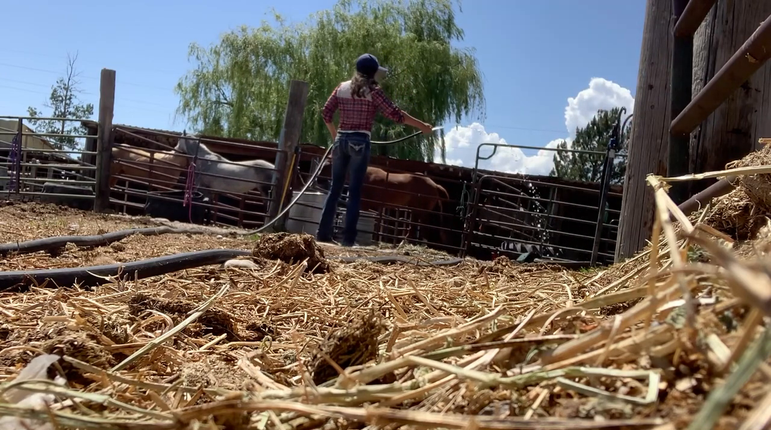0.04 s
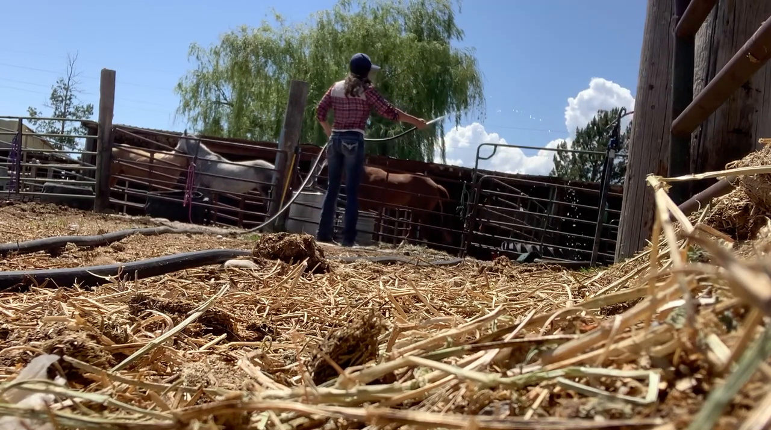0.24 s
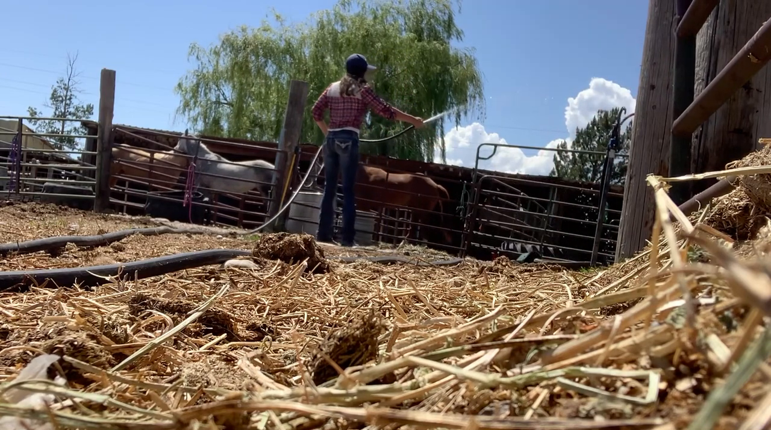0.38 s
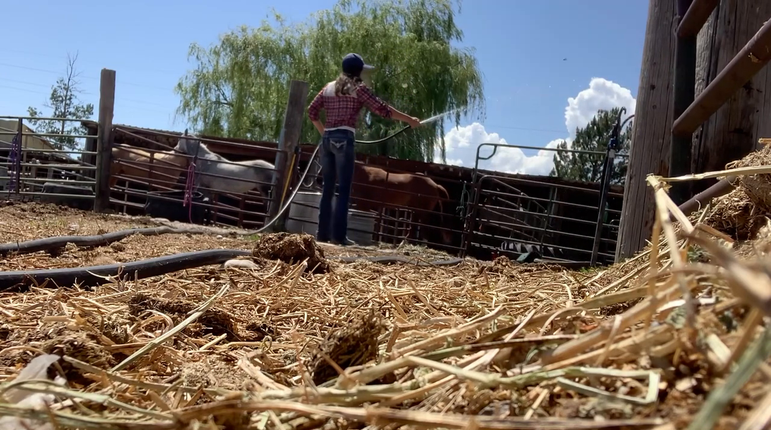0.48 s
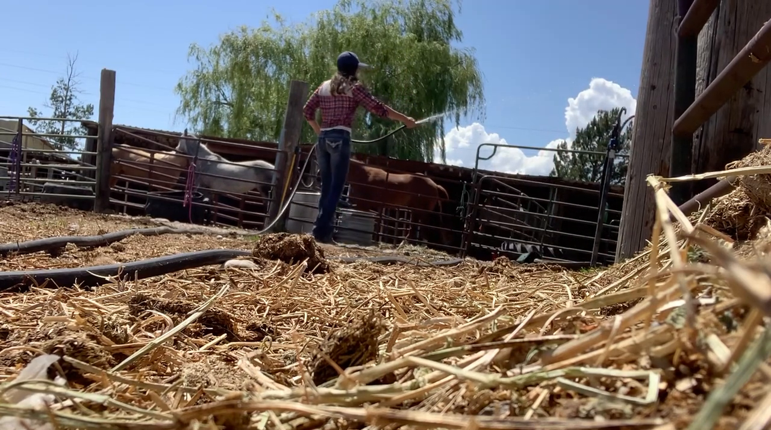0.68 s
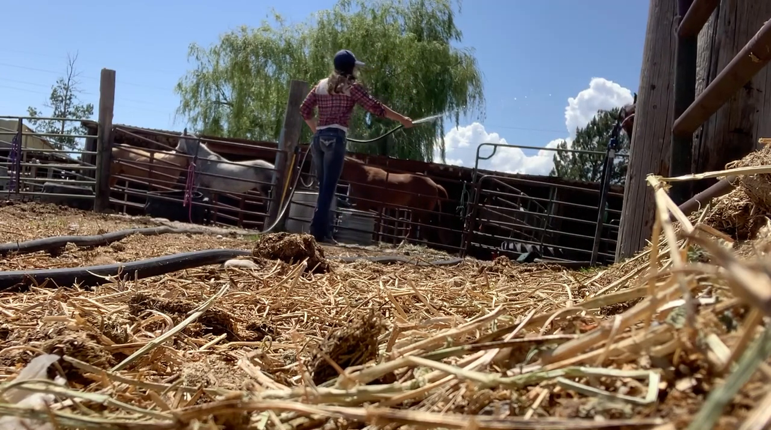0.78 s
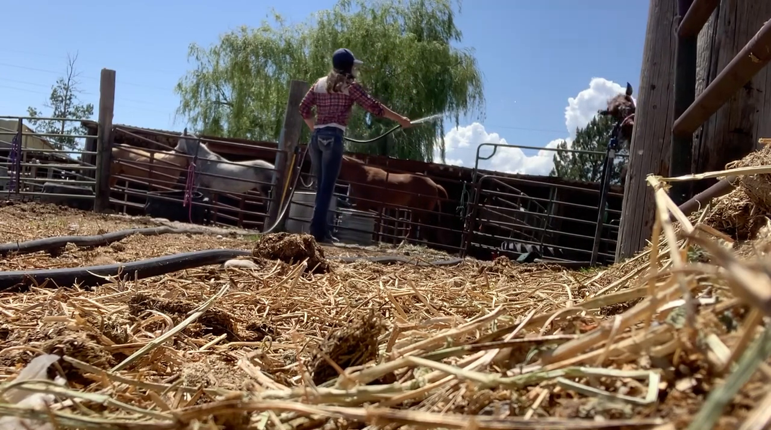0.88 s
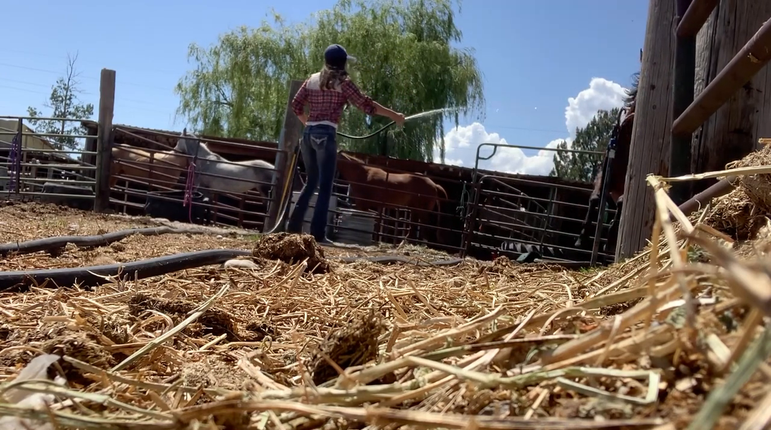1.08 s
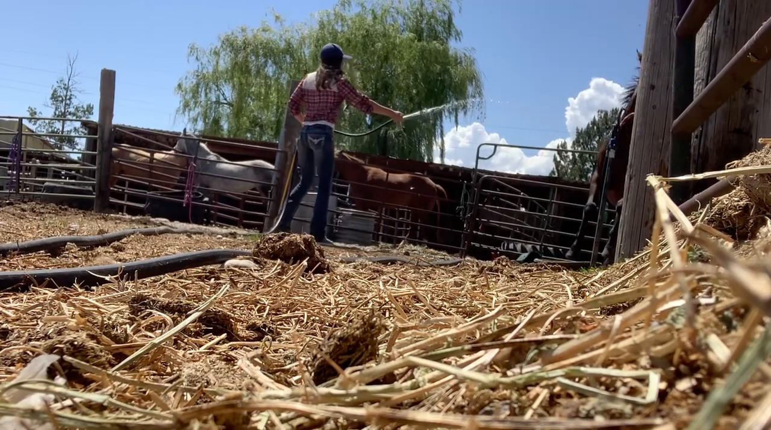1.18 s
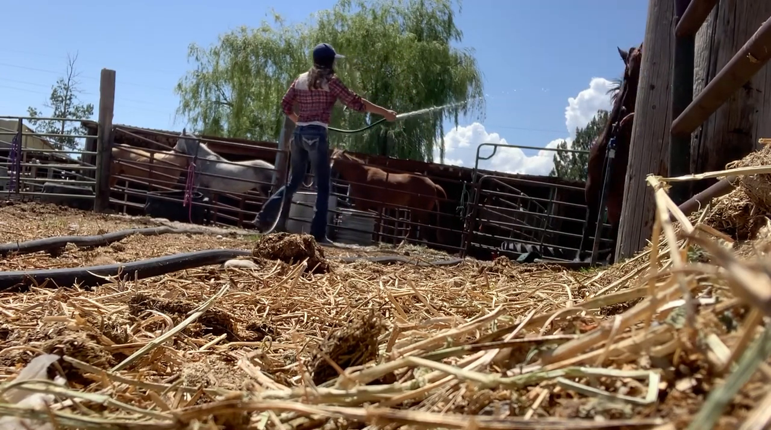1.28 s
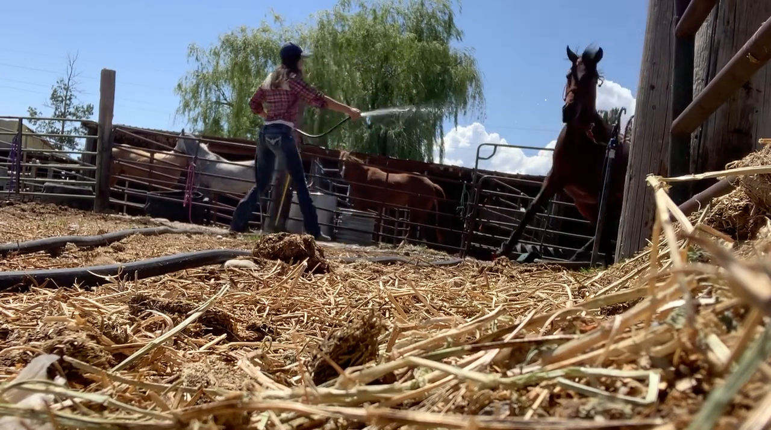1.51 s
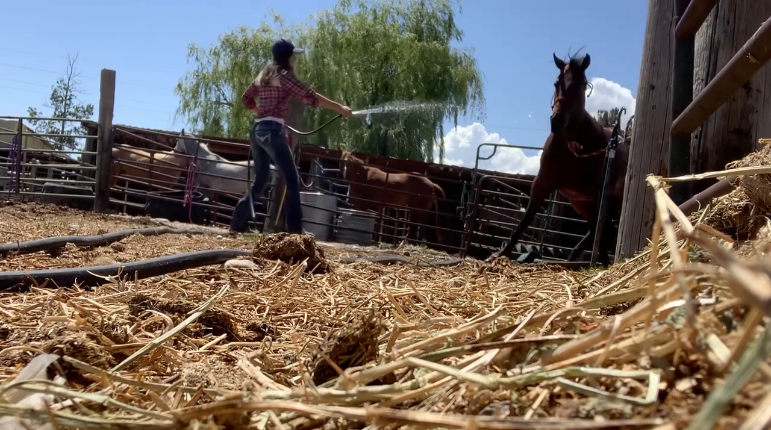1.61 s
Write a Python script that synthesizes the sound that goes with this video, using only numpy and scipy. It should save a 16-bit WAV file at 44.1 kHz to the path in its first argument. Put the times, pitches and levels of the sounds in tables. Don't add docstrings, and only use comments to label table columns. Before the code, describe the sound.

A horse's hooves stamp and thud irregularly on straw-covered dirt, with crunching clods and snapping straw.

```python
import sys
import numpy as np
from scipy import signal
from scipy.fft import rfft, irfft
from scipy.io import wavfile
from scipy.ndimage import uniform_filter1d

SR = 44100
rng = np.random.default_rng(int(sys.argv[2]) if len(sys.argv) > 2 else 0)


def waveform_to_disk(signal):
    frames = np.transpose(np.atleast_2d(signal))
    scaled = np.clip(frames, -1, 1) * 32767
    samples = np.round(scaled).astype(np.int16)
    wavfile.write(sys.argv[1], SR, samples)


def attenuation_scalar(level_db):
    decades = np.asarray(level_db, float) / 20
    return 10 ** decades


N = 72765
T = np.arange(N) / SR

# (time [s], trampling level [dB], straw stirring level [dB], drag level [dB])
ACTIVITY_LEVELS = [(0, -66, -81.5, -55.5), (0.061, -51, -75.5, -49.5), (0.148, -62.5, -79.5, -51.5),
                   (0.268, -51.5, -82, -58.5), (0.356, -59, -72, -49), (0.478, -57.5, -81.5, -51.5),
                   (.58, -44.5, -70.5, -44.5), (0.694, -52, -75.5, -49.5), (0.734, -53.5, -75.5, -39),
                   (0.831, -46, -79.5, -46.5), (0.908, -59.5, -78.5, -55.5), (1.01, -52, -82, -53),
                   (1.134, -54.5, -78, -47.5), (1.27, -60, -70, -55.5), (1.38, -50, -72.5, -41),
                   (1.48, -53, -77, -51.5), (1.571, -66.5, -74.5, -57.5), (1.65, -44, -75, -66)]


def activity_db(column):
    table = np.array(ACTIVITY_LEVELS)
    return np.interp(T, table[:, 0], table[:, column])


def colour(x, points):
    hz, db = np.array(points).T
    bins_hz = np.arange(N // 2 + 1) * SR / N + 1
    gain = attenuation_scalar(np.interp(np.log(bins_hz), np.log(hz), db))
    y = irfft(rfft(x) * gain, N)
    return y / np.sqrt(np.mean(y ** 2))


def band(x, lo_hz, hi_hz):
    return signal.sosfilt(signal.butter(2, [lo_hz, hi_hz], "band", fs=SR, output="sos"), x)


def fade(t, t60):
    return (t > 0) * np.exp(-np.log(1000) * np.maximum(t, 0) / t60)


def grains(rate, spread_db):
    hits = rng.random(N) < rate / SR
    return hits * rng.standard_normal(N) * attenuation_scalar(spread_db * rng.exponential(size=N))


def patchy(x, lo_hz, rate, patchy_db, count):
    edge = lo_hz * 2 ** (np.arange(count + 1) / 3)
    k = int(SR / rate)
    held = np.repeat(rng.standard_normal((count, N // 200)), k, axis=1)[:, :N]
    smooth = uniform_filter1d(uniform_filter1d(held, k), k)
    gain = attenuation_scalar(patchy_db * smooth)
    return sum((-1) ** i * band(x, edge[i], edge[i + 1]) * g for i, g in enumerate(gain))


def soil(tail):
    # (frequency [Hz], level [dB per Hz])
    soil_spectrum = [(18, -53.5), (30, -7.5), (81, -4.5), (291, -6), (428, -13), (564, -18.5),
                     (1150, -31.5), (1730, -41), (2400, -45), (3120, -65), (5280, -120)]
    loosened = attenuation_scalar(-11.5) * tail
    rumble_env = attenuation_scalar(activity_db(1) + 3.0) + loosened
    drag_env = attenuation_scalar(activity_db(3) - 2.5) + loosened
    out = []
    for _ in range(2):
        noise = colour(grains(12000, 0.65), soil_spectrum)
        rumble = rumble_env * patchy(noise, 31.58, 25.4, 3.2, count=8)
        drag = drag_env * patchy(noise, 194.2, 54.25, 3.0, count=11)
        out.append(rumble + drag)
    return out


def straw(tail):
    # (frequency [Hz], level [dB per Hz])
    straw_spectrum = [(1500, -38.5), (2400, -3), (5000, -4.5), (8000, -3.5), (11000, -3), (14500, -3.5),
                      (15700, -0.5), (16100, -54)]
    # (time [s], level [dB], low crackle [dB], low crackle pitch [Hz], high crackle [dB])
    snaps = [(0.032, -61, -13, 2260, 8), (0.0568, -27, -28, 5400, -25), (0.0689, -41.5, -20, 5550, -9),
             (0.1992, -58, 3, 5700, -18), (0.237, -57, -39, 2440, -16), (0.2808, -36, -52, 5110, -5),
             (0.308, -39.5, -14.5, 3670, -34), (0.5208, -30, -7.5, 2090, -32),
             (0.5455, -46.5, 1, 3270, -18), (0.6107, -36, -37, 5960, -15), (0.634, -30, -27.5, 3650, -9),
             (0.649, -28, -25, 2340, -14.5), (0.700, -34.5, -32, 5050, -12),
             (0.7346, -35, -27.5, 2700, -16), (0.7856, -40.5, -11.5, 2380, -5.5),
             (0.8924, -54.5, -7, 4570, 4.5), (1.0304, -50.5, -8, 5050, -27),
             (1.051, -47.5, -5.5, 3880, -10), (1.1983, -37, -13.5, 4560, -3.5),
             (1.3062, -31.5, -14.5, 6350, -31), (1.3304, -57, -21, 3640, 9),
             (1.5194, -34.5, -14, 4560, -6.5), (1.5286, -32, -21, 4770, -14),
             (1.6173, -27.5, -28, 3540, -8)]
    # (time [s], level [dB])
    ticks = [(0.018, -64), (0.06, -32), (0.074, -38), (0.083, -38), (0.1216, -57), (0.1496, -58),
             (0.21, -44), (0.396, -48), (0.415, -49), (0.6274, -40), (0.638, -39), (0.643, -31),
             (0.6525, -34), (0.658, -35), (0.6724, -36), (0.681, -47), (0.7976, -37.5), (0.8846, -47),
             (0.8984, -26.5), (0.9443, -59), (1.071, -41), (1.1358, -48), (1.211, -31), (1.222, -36),
             (1.2507, -27.5), (1.2702, -31), (1.299, -62), (1.3094, -31), (1.3573, -34), (1.371, -34),
             (1.383, -27.5), (1.398, -23.5), (1.442, -46), (1.583, -31), (1.6062, -29), (1.6444, -25)]
    snap_t60_s, snap_db = 0.022, 6

    high_env = np.zeros(N)
    for s, db, _, _, high_db in snaps:
        high_env += attenuation_scalar(db + high_db + snap_db + 2.5) * fade(T - s, 0.21 * snap_t60_s)
    for s, db in ticks:
        high_env += attenuation_scalar(db - 15.5) * fade(T - s, 0.0082)

    spray = attenuation_scalar(-30) * tail * (T % 0.011 < 0.007)
    rustle_env = attenuation_scalar(activity_db(2) + 7.0) + spray
    out = []
    for _ in range(2):
        low_noise, high_noise = rng.standard_normal((2, N))
        rustle = colour(grains(9000, 0.35), straw_spectrum)
        x = rustle_env * patchy(rustle, 1757.0, 36.18, 3.3, count=10)
        x += 1.22 * band(high_env * high_noise, 8270, 13700)
        for s, db, low_db, hz, _ in snaps:
            burst = attenuation_scalar(db + low_db + snap_db) * fade(T - s, 1.29 * snap_t60_s) * low_noise
            x += 1.52 * band(burst, hz / 1.13, hz * 1.174)
            x += 0.7 * band(burst, 670, 9300)
        out.append(x)
    return out


def crunch():
    # (time [s], level [dB], t60 [s], pitch [Hz])
    crunches = [(0.023, -50, 0.14, 720), (0.072, -55, 0.33, 1170), (0.2045, -32, 0.024, 800),
                (0.281, -38.5, 0.044, 600), (0.331, -50.5, 0.13, 1000), (0.358, -51.5, 0.23, 1030),
                (0.397, -34.5, 0.13, 664), (0.47, -36, .04, 594), (0.492, -40.5, 0.18, 706),
                (0.568, -38, 0.084, 1000), (0.602, -34.5, 0.044, 653), (0.632, -41, 0.032, 1130),
                (0.708, -67, 0.035, 543), (0.728, -44, 0.44, 793), (0.809, -48, 0.16, 1000),
                (0.973, -43.5, 0.097, 726), (1.081, -45, .05, 705), (1.163, -44.5, 0.1, 820),
                (1.198, -49.5, 0.044, 1000), (1.261, -56.5, 0.21, 1200), (1.331, -29, 0.078, 910),
                (1.35, -46, .08, 720), (1.431, -48.5, .03, 700), (1.38, -45, 0.03, 700),
                (1.634, -58, 0.046, 705)]
    grit = grains(4600, 2.43)
    out = np.zeros(N)
    for s, db, t60, hz in crunches:
        env = (1 - fade(T - s, 0.011)) * fade(T - s, t60)
        out += band(attenuation_scalar(db + 16) * env * grit, hz / 1.15, hz * 1.26)
    return out


def wave(t, front_hz, hz, peak):
    fall_s = 0.003553
    u = np.clip(t, 0, 12 * peak)
    turns = hz * u + (front_hz - hz) * fall_s * (1 - np.exp(-u / fall_s))
    swell = (u / peak * np.exp(1 - u / peak)) ** 3.28
    return swell * np.sin(2 * np.pi * turns)


def hoof_knock(t, grit):
    # (frequency [Hz], level [dB], t60 [s])
    knock_modes = [(837, 3, 0.019), (1197, -3.5, 0.031), (1397, -4.5, 0.038), (2494, -12.5, 0.043)]
    late = t - 0.0012
    ring = sum(attenuation_scalar(db) * np.sin(2 * np.pi * hz * late) * fade(late, t60) for hz, db, t60 in knock_modes)
    return ring / 2 + 1.34 * grit * (1 - fade(t, 0.015)) * fade(t, 0.085)


def hooves():
    # (time [s], level [dB], pitch the thud settles on [Hz], knock level [dB], boom level [dB])
    stamps = [(0.033, -44, 101.5, -2.5, 7), (0.201, -28.5, 96, -16.5, 1), (0.3964, -30, 139, -18, -7.5),
              (.522, -29, 98.6, 9.5, -21), (0.5246, -19, 99, -38, -6.5), (0.599, -37, 133, -13.5, -2),
              (0.704, -44.5, 263, -37, -9), (0.939, -47.5, 91, -38, -15), (0.971, -44, 393, -18, -18),
              (1.032, -17.5, 98, -45, -37), (1.052, -34, 213, -50, -23), (1.08, -37, 178, -26, -18),
              (1.311, -34, 194, -13.5, -10), (1.330, -19.5, 187, -18, -12), (1.43, -44, 163, -3.5, -23),
              (1.608, -41, 163, -49, -30), (1.629, -38, 247, -21, -23)]
    # (time [s], level [dB], pitch [Hz])
    scuffs = [(0.081, -41.5, 77), (0.112, -35.5, 271), (0.047, -38.5, 245), (0.079, -47.5, 390),
              (.126, -41, 296), (0.136, -41.5, 134), (0.148, -43, 270), (0.16, -54, 197),
              (.204, -38.5, 576), (0.219, -28, 250), (0.358, -40.5, 153), (.461, -55, 59),
              (0.506, -45, 252), (0.538, -50, 218.5), (0.552, -30, 237), (0.581, -32, 128),
              (0.615, -29, 124), (0.648, -33, 70.7), (0.734, -35.5, 281), (.764, -36, 81),
              (.793, -39.5, 65.6), (.778, -46, 242), (0.814, -47, 300), (0.834, -40.5, 232),
              (0.662, -54, 285), (0.944, -46.5, 306), (0.851, -43, 108), (0.898, -49, 83),
              (1.136, -37, 330), (1.169, -33.5, 143), (1.436, -44, 1105), (.978, -46.5, 780),
              (1.153, -52, 1200), (1.208, -36.5, 213), (1.19, -30.5, 141.2), (1.191, -42.5, 55.3),
              (1.34, -36, 327), (1.348, -32, 294), (1.3559, -24, 335), (0.406, -51, 188), (0.706, -49, 302),
              (.751, -46, 335), (1.362, -31, 147), (1.372, -30.5, 363), (1.396, -49, 181),
              (1.447, -45.5, 313), (1.472, -44, 250), (1.493, -40, 194), (1.505, -46.5, 313)]
    front_hz, thud_peak_s = 1000, 0.0073
    boom_hz, boom_late_s, boom_peak_s = 68.4, 0.0068, 0.013

    out, tail = np.zeros(N), np.zeros(N)
    grit = band(grains(9000, 1.0), 1040, 1530)
    for s, db, hz, knock_db, boom_db in stamps:
        t = T - s
        hardness = min(attenuation_scalar(0.2 * (db + 17.0)), 1)
        thud = wave(t, hz + (front_hz - hz) * hardness, hz, thud_peak_s * (105 / hz) ** 0.31)
        boom = wave(t - boom_late_s, 0.56 * boom_hz, boom_hz, boom_peak_s)
        out += attenuation_scalar(db) * (thud - attenuation_scalar(knock_db) * hoof_knock(t, grit) + attenuation_scalar(boom_db) * boom)
        tail += attenuation_scalar(db) * (1 - fade(t, 0.031)) * fade(t, 0.099)
    for s, db, hz in scuffs:
        out += attenuation_scalar(db) * wave(T - s + 0.004335, 1.14 * hz, hz, 1.32 / hz)
    return out, tail


def ports(x, other, apart):
    # (frequency [Hz], lead of the left channel [rad])
    stereo_phase = [(0, 0), (600, -.55), (1200, -.9), (2400, -2.2), (2900, -2.1), (3700, -1.5), (4900, -1.7),
                    (6500, -2.1), (7400, -3.1), (9700, -3.1), (11600, -1.1), (13000, -.1), (14600, .1),
                    (15600, .7)]
    hz, lead = np.array(stereo_phase).T
    bins_hz = np.arange(N + 1) * SR / N / 2
    turned = rfft(x, 2 * N) * np.exp(1j * np.interp(bins_hz, hz, lead))
    left = irfft(turned)[:N]
    return np.array([left + apart * other, x - 0.12 * apart * other])


def scene():
    hits, tail = hooves()
    hits = hits + crunch()
    rumble, other_rumble = soil(tail)
    stalks, other_stalks = straw(tail)
    ground_apart = other_rumble + 0.25 * np.roll(hits, 90)
    straw_apart = band(other_stalks, 840, 8000) + 0.61 * other_stalks
    return ports(hits + rumble, ground_apart, 0.49) + ports(stalks, straw_apart, 0.44)


def band_limit(x):
    return signal.sosfilt(signal.butter(12, 17070, fs=SR, output="sos"), x)


def record(dry):
    x = signal.sosfilt(signal.butter(2, 35, "high", fs=SR, output="sos"), dry)
    x = signal.sosfilt(signal.ellip(6, 0.3, 45, 16350, fs=SR, output="sos"), x)
    return band_limit(x)


dry = scene()
out = record(dry)
waveform_to_disk(out)
```